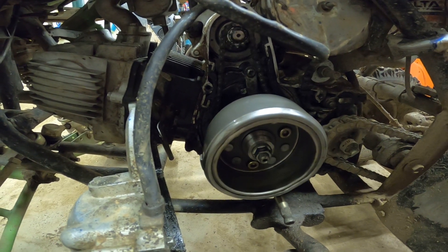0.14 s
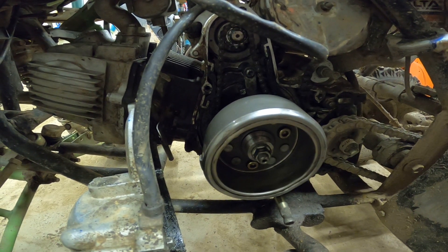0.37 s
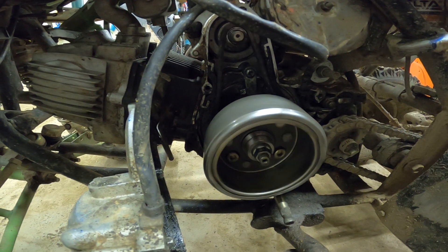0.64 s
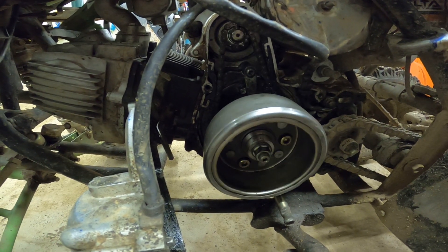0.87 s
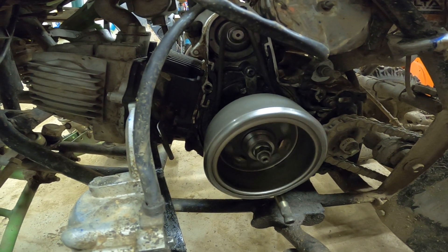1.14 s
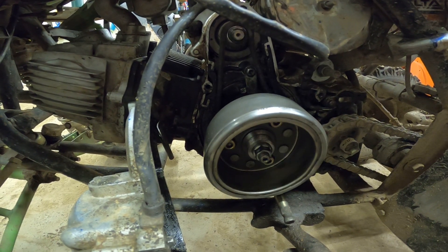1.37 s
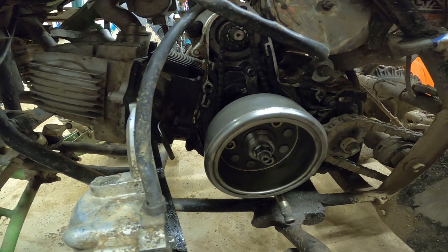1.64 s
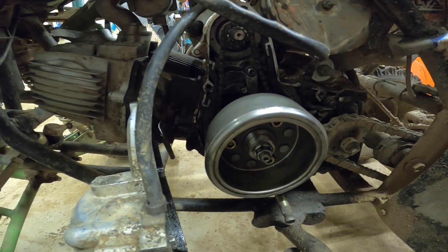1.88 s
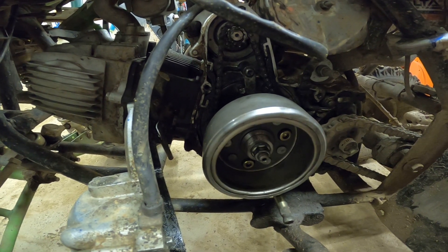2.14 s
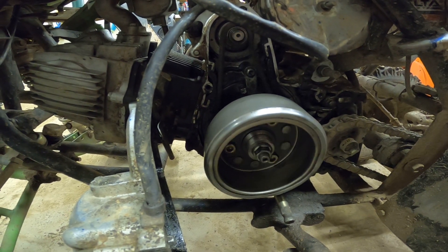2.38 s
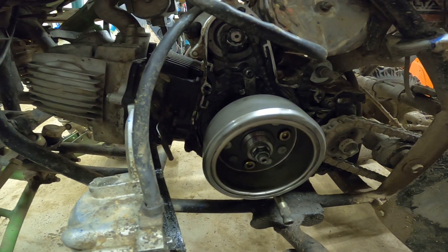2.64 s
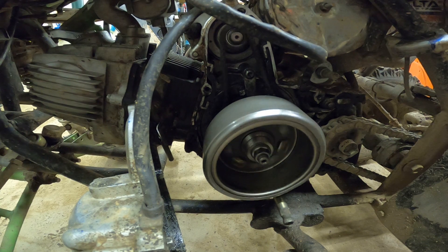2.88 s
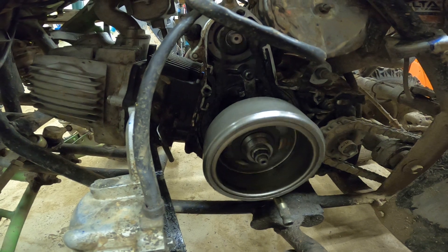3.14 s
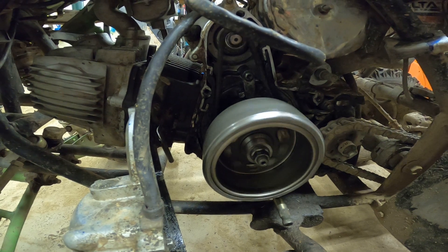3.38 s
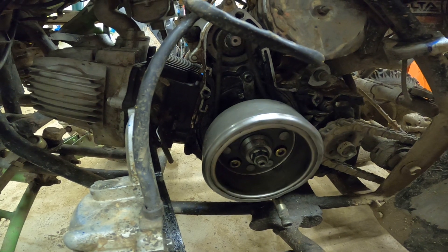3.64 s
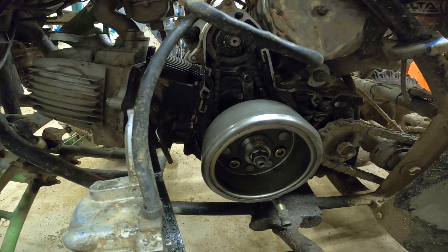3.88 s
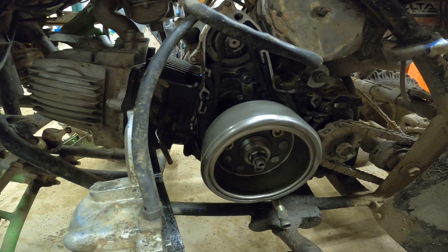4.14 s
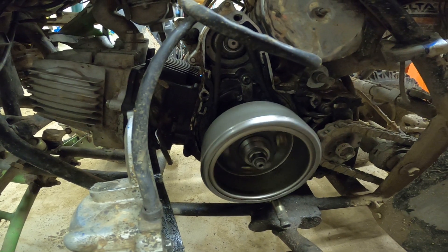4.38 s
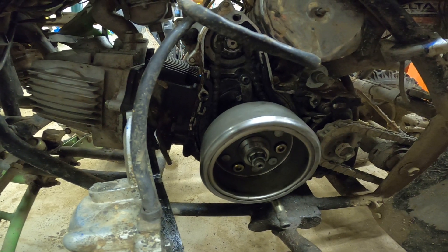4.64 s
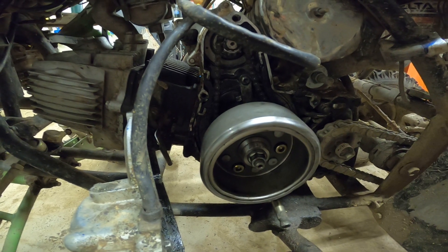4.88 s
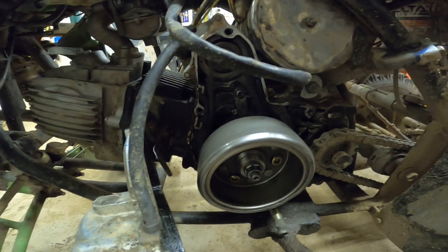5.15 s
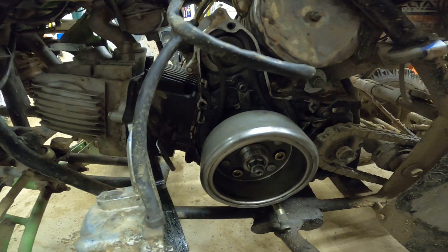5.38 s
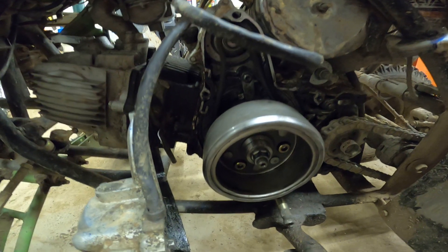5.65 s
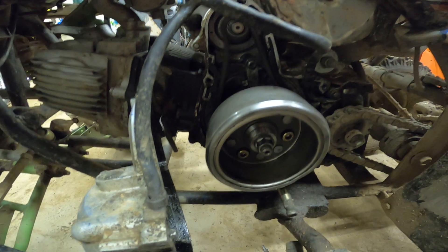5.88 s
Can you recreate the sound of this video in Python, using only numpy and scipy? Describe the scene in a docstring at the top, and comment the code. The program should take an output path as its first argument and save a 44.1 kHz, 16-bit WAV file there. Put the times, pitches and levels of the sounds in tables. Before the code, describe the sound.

A starter gear rattle coasts down with a few ticks, then a near-silent pause. Ten short bumps follow, irregularly spaced: each a hard solenoid clack, a rough metallic gear rattle and a low groan that dies quickly. Midway a toothy crash thumps the steel frame. Finally teeth grind in a rapid clatter and the motor spins on with a faint rising whine. Close stereo microphone, small workshop with light echo.

```python
"""Bumping a small engine's starter

An electric starter is bumped ten times in a workshop, close to a microphone with two ports.
Each bump is a solenoid clack, a gear rattle made of random tooth hits, and a groan of rough tones and noise.
Noise bursts make the pinion jarring the flywheel; they ring the steel frame, while low tones swell and fade.
At the end the pinion grinds in and the motor spins on, with a whine of sine tones that climbs and settles.
"""
import sys
import numpy as np
from scipy import signal
from scipy.fft import rfft, irfft, next_fast_len
from scipy.io import wavfile

SR = 44100
rng = np.random.default_rng(int(sys.argv[2]) if len(sys.argv) > 2 else 0)


def ratio_of_db(decibels):
    """Turn decibels (scalar or array-like) into linear amplitude factors; 0 dB maps to 1."""
    return 10 ** (np.asarray(decibels, float) / 20)


def transcribe(signal):
    """Save signal, clipped to [-1, 1], as a 16-bit WAV file at the path in sys.argv[1]."""
    frames = np.atleast_2d(signal).T
    limited = np.clip(frames, -1, 1)
    pcm = np.round(limited * 32767).astype(np.int16)
    wavfile.write(sys.argv[1], SR, pcm)


N = 265393

# Levels in the tables and settings are starting points: the functions add their own offsets.
# bumps of the starter: [solenoid closes t/s, run-up length t/s, top of rattle level/dB, coasting fall/(dB/s)]
BUMPS = [(0.683, 0.031, -14, 205.5), (1.3083, 0.07, -17.5, 153.5), (2.0849, 0.061, -14, 219),
         (2.426, 0.047, -19, 107.5), (2.621, 0.078, -14, 213), (3.013, 0.06, -25, 159),
         (3.2778, 0.06, -15.5, 241), (3.5516, 0.063, -19.5, 134.5), (4.2235, 0.052, -15, 230.5),
         (4.516, 0.081, -20, 142.5)]
# the motor surges again, without a solenoid clack of its own: [same columns as the bumps]
SURGE = (0.952, .048, -17, 240)
# a slow drag: [start t/s, top t/s, level/dB, rise/dB, fall/(dB/s), hold t/s]
CREEP = (0.82, 0.905, -26, 4, 300, .02)
# pinion seating and slack taken up: [t/s, level/dB]
CLACKS = [(0.082, -26), (0.163, -22.5), (0.6969, -8), (0.778, -5), (0.8946, -28), (0.928, -13.5),
          (0.942, -9.5), (1.456, -11), (2.1001, -6), (2.546, -13.5), (3.136, -31), (3.2972, -17.5),
          (3.692, -10.5), (4.2366, -6.5), (4.6667, -19.5), (5.1267, -10.5), (5.14, -11.5)]
# light ticks as gears settle and the switch moves: [t/s, level/dB]
TICKS = [(0.018, -14), (0.024, -18.5), (0.04, -25.5), (0.198, -38.5), (0.2257, -40), (0.2493, -32),
         (0.265, -37), (0.297, -37), (0.3186, -43), (0.342, -59), (0.637, -58.5), (0.666, -47),
         (1.468, -19), (1.525, -26), (1.556, -34), (1.654, -37.5), (1.7177, -39.5), (1.916, -50),
         (1.946, -41), (2.017, -52), (2.047, -39.5), (2.242, -29), (3.153, -25), (3.2174, -31),
         (3.853, -29.5), (3.9297, -41.5), (4.036, -39.5), (4.161, -45.5), (4.1875, -37), (4.849, -32),
         (4.9642, -38.5), (5.0912, -36.5)]
# pinion teeth jarring the flywheel ring: [t/s, crash level/dB, thump level/dB]
JARS = [(2.757, -6.5, -17), (2.7675, -10.5, -18), (5.1615, -5.5, -16.5), (5.181, -16.5, -31),
        (5.186, -9.5, -31), (5.2054, -14.5, -29), (5.209, -19.5, -17), (5.226, -10.5, -38.5),
        (5.2448, -9, -18), (5.2615, -7.5, -31), (5.2782, -10.5, -18), (5.294, -9, -26.5),
        (5.3453, -7.5, -38), (5.3542, -10, -27.5)]
# dull knocks of the button: [t/s, level/dB]
KNOCKS = [(0.641, -31), (0.665, -27.5)]
# faint bright hiss swelling before some clacks: [start t/s, level/dB]
HISSES = [(0.6385, -56.5), (2.048, -53.5), (4.1898, -53), (5.0907, -80)]
# the motor spinning free: [t/s, armature f/Hz, whine level/dB]
WHINE = [(5.45, 164.7, -43), (5.6, 197.3, -43), (5.8, 202.5, -35), (6.018, 206.4, -33.5)]
# whine tones: [multiple of the armature frequency, level/dB]
WHINE_ORDERS = [(1, -2), (2, -5.5), (4, -11.5), (6, -7)]
# bracket tones, peaking as the rotor slows: [top t/s, f/Hz, level/dB]
BRACKET_TONES = [(0.121, 316, -43), (0.735, 273.3, -28.5), (1.0, 374, -38), (1.4, 367, -28),
                 (2.2, 458, -33.5), (2.5, 416, -46), (2.67, 269, -36.5), (3.1, 306.2, -40),
                 (3.38, 420, -38.5), (3.649, 349, -36), (4.318, 462.3, -34), (4.609, 310.8, -29.5),
                 (5.3, 287.2, -25.5)]
# housing resonances: [f/Hz, width f/Hz (at least 20 is used), level/dB]
CASING = [(1047, 22, -3), (1139.5, 32, 8), (1233, 13, 2.5), (1327, 14, 4), (1608, 25, -1.5),
          (2060, 12, -22), (2103, 65, -3), (2268, 22, 9.5), (2667, 68, -9), (3267, 58, 8.5),
          (3608, 90, 0.5), (3740, 71, 7), (3964, 210, -1.5), (4860, 130, 11), (7140, 960, 1)]
# spectrum shapes, of which only the relative levels matter: [f/Hz, level/dB]
GEAR_COLOUR = [(180, -41), (300, -18.5), (838, -8), (1130, 0), (1790, -2), (2190, -1), (2500, -4),
               (4850, -13.5), (7330, -22.5), (12700, -39), (15700, -67.5)]   # gears under load
FREE_COLOUR = [(240, -14), (400, -12), (654, -15), (1210, -5.5), (1620, -3.5), (1770, -8.5), (3820, -9),
               (4390, -14), (4890, -15.5), (10000, -32), (12700, -35), (15700, -58)]   # gears running free
CLACK_COLOUR = [(180, -42), (300, -42), (1330, 8.5), (2010, 1), (2380, 7), (3200, 0), (4040, 3.5),
                (7450, -8), (15700, -33.5)]   # clacks, ticks and hisses
JAR_COLOUR = [(290, -37), (480, -19.5), (720, 1), (1260, -3), (1800, -5.5), (3450, 8), (5800, 1), (6900, 3),
              (12500, -21), (15700, -44.5)]   # crashes of the teeth
AIR_COLOUR = [(18, -34.5), (30, -1.5), (325, 7), (842, -29.5), (1140, -12.5), (12000, -30), (15600, -67),
              (22000, -120)]   # background noise
# ringing modes of the steel frame: [f/Hz, time to fall 60 dB t/s, level/dB]
FRAME = [(185.4, 0.12, -29.5), (221.5, 0.16, -25), (279.8, 0.21, -20), (330.6, 0.17, -24),
         (468, 0.064, -36)]
# the longest frame tube swells after a shove: [top t/s, level/dB]
HUM = [(0.049, -45.5), (0.36, -49.5), (0.78, -34), (1.0, -37), (1.5, -46.5), (2.19, -36.5), (2.78, -27),
       (2.9, -47), (3.38, -41), (3.62, -47.5), (3.851, -50), (4.3, -36), (4.42, -41), (4.719, -44),
       (5.19, -27.5), (5.235, -24.5), (5.36, -32)]
# a deeper frame mode, same rule: [top t/s, level/dB]
DRONE = [(0.8, -36.5), (2.2, -37.5), (2.81, -29), (3.4, -39.5), (3.5, -45.5), (4.33, -45)]
# the frame sways after the first jar: [t/s, level/dB]
SWAY = [(2.76, -40), (2.83, -28), (3.0, -43.5), (3.3, -46.5), (4.192, -54), (4.33, -39), (4.42, -48),
        (4.58, -60)]
# echo of the workshop: [f/Hz, time to fall 60 dB t/s]
SHOP_T60 = [(60, 0.5), (420, 0.082), (1100, 0.71), (2900, 0.3), (7700, 0.088), (15000, 0.26)]
# difference between the ports: [f/Hz, left minus right level/dB]
PORT_BALANCE = [(60, 8), (130, -3.5), (290, 1), (640, -1), (1410, 2.5), (3100, 3), (6820, -2),
                (15000, -4.5)]

SIDES = np.array([[1], [-1]])   # signs for the left and right port

# rattle during a bump: rise (dB), hold at the top (s), time from reaching the top to the end of torque (s)
RUN_UP_DB, HOLD_S, LET_GO_S = 8, .022, .045
LINGER_DB, LINGER_FALL = -18.5, 93   # loose parts buzz on: dB against the top, fall in dB per s
OPENING_DB, OPENING_FALL, OPENING_BRAKE = -25.5, 30, 195   # earlier run coasts out: dB, dB per s, dB per s^2
# the pinion grinds in: start, top and end (s), level (dB), fall (dB per s)
GRIND_S, GRIND_TOP_S, GRIND_END_S, GRIND_DB, GRIND_FALL = 5.123, 5.156, 5.3, -19.5, 600
RUN_S, RUN_RISE_S, RUN_DB = 5.35, 0.16, -23.5   # free run: start (s), rise time (s), rattle (dB)
# wander of the housing and unevenness of the teeth (dB); share of both that running free takes away
WANDER_DB, LUMPY_DB, FREE_CALM = 3.2, 3.5, .65
SNAGS_PER_S, SNAG_DB = 60, 15   # a burred tooth hits harder, until the grinding ends
TURN_BEAT = .45   # depth of the once-a-turn beat in the final run
# groan: level at a -19 dB rattle (dB), share of its swing, lag (s), rise (dB), fall (dB per s)
GROAN_DB, GROAN_FOLLOWS, GROAN_LAG_S, GROAN_RISE_DB, GROAN_FALL = -34, 1, 0.006, 10, 81.3
GROAN_OPENING_DB, GROAN_RUN_DB = -11.5, -37.5   # against the opening rattle; in the free run
GROAN_JAR_DB, GROAN_JAR_FALL = -18.5, 49   # dB against a thump, fall in dB per s
TONE_RISE_S, TONE_RISE_DB, TONE_HOLD_S, TONE_FALL = .05, 16, .04, 190   # bracket tone: s, dB, s, dB per s
SOLENOID_DB, SOLENOID_TRAVEL_S = -9, 0.0015   # the plunger lands just after it starts to move
FLUTTER_DB, FLUTTER_S = -21.5, 0.17   # loose joints chatter: dB against a thump, decay in s
HISS_RISE_S = 0.077   # time a hiss takes to swell
HUM_HZ, HUM_RISE_S, HUM_FALL = 145.7, 0.19, 64   # Hz, longest rise in s, dB per s
DRONE_HZ, DRONE_FALL = 79.1, 76   # Hz, dB per s
SWAY_HZ = 38.2
AIR_DB = -64
# above the top frequency the phase difference between the ports stays constant
LEFT_LAG_S, LAG_TOP_HZ = 4.5e-5, 5400


def effort():
    """Levels of gear rattle and motor groan: torque lifts both, and they fall as the motor coasts."""
    t = np.arange(N) / SR
    on, length, top_db, fall = np.transpose(BUMPS + [SURGE])
    top = on + length
    bumps = swells(on, top, top_db, RUN_UP_DB, fall, HOLD_S)
    linger = swells(top, top, top_db + LINGER_DB, 0, LINGER_FALL)
    opening = OPENING_DB - OPENING_FALL * t - OPENING_BRAKE * t ** 2
    grind = swells(GRIND_S, GRIND_TOP_S, GRIND_DB, 8.3, GRIND_FALL)
    grind = grind - 400 * np.maximum(t - GRIND_END_S, 0)
    run = swells(RUN_S, RUN_S + RUN_RISE_S, 0, 12.3, 0)
    rattle = together(bumps, swells(*CREEP), linger, opening, grind, RUN_DB + run)

    jar_s, _, thump_db = np.transpose(JARS)
    groan_top = GROAN_DB + GROAN_FOLLOWS * (top_db + 19)
    groaning = together(swells(on, top + GROAN_LAG_S, groan_top, GROAN_RISE_DB, GROAN_FALL),
                        GROAN_OPENING_DB + opening + 25 * t,
                        swells(jar_s, jar_s + 0.01, thump_db + GROAN_JAR_DB, 24.0, GROAN_JAR_FALL),
                        GROAN_RUN_DB + run)
    return rattle, groaning


def gears(rattle_db, armature, free):
    """Teeth touch densely and unevenly and shake the housing; running free they sound different and more even."""
    t = np.arange(N) / SR
    steady = free * (t > GRIND_END_S)
    touches_per_s = 3000 * ratio_of_db(LUMPY_DB * (1 - FREE_CALM * steady) * drift(50))
    touch = rng.random(N) < touches_per_s / SR
    strength = ratio_of_db(4.3 * np.minimum(rng.exponential(1, N), 3.2))
    force = touch * strength * (1 + TURN_BEAT * steady * np.cos(armature))
    snags = (rng.random(N) < SNAGS_PER_S / SR) * (t < GRIND_END_S)
    force = force + ratio_of_db(SNAG_DB) * snags

    meshes = []
    for mesh in range(2):   # the first is heard alike, the second opposed in the two ports
        signs = rng.choice([-1, 1], N)
        housing = casing(force * signs, broad_db=-3.0, shift_db=WANDER_DB * (1 - FREE_CALM * free))
        loaded = unit(colour(housing, GEAR_COLOUR))
        unloaded = unit(colour(housing, FREE_COLOUR))
        meshes.append((1 - free) * loaded + free * unloaded)
    rattle = meshes[0] + ratio_of_db(-17.0) * SIDES * treble(meshes[1], edge_hz=1500)

    starts = np.sort([-1, GRIND_S] + [bump[0] for bump in BUMPS + [SURGE]])
    began = starts[np.searchsorted(starts, t) - 1]
    slow = np.exp(-(t - began) / 0.0088)   # the level grows as the rotor gathers speed
    dull = np.exp(-(t - began) / 0.028)   # and the treble follows later
    off = np.sort([bump[0] + bump[1] + LET_GO_S for bump in BUMPS + [SURGE]])
    ended = np.append(-2, off)[np.searchsorted(off, t)]
    coast = (ended > began) * np.exp(-(t - ended) / 0.064)   # without torque the teeth unload at once
    top_share = np.clip(1 - 0.34 * dull - 0.82 * coast, 0, 1)
    top = top_share * treble(rattle, edge_hz=2970)
    body = treble(rattle, edge_hz=240) - treble(rattle, edge_hz=3290)
    return ratio_of_db(rattle_db - 2.0 - 19.0 * slow - 5.9 * coast) * (body + top)


def groan(db, free):
    """Slightly rough bracket tones over a low scrape of the motor; its shaking rumbles in each port."""
    t = np.arange(N) / SR
    wobble = .8 * drift(16)
    rough = ratio_of_db(4 * drift(35) - 2)
    tones = 0
    for s, hz, top_db in BRACKET_TONES:
        level_db = swells(s - TONE_RISE_S, s, top_db, TONE_RISE_DB, TONE_FALL, TONE_HOLD_S)
        tones = tones + ratio_of_db(level_db) * np.sin(2 * np.pi * hz * t + wobble)
    scrape_band = signal.butter(3, [220, 530], "band", fs=SR, output="sos")
    scrape = signal.sosfilt(scrape_band, rng.standard_normal(N))
    low_band = signal.butter(2, [30, 125], "band", fs=SR, output="sos")
    low = signal.sosfilt(low_band, rng.standard_normal((2, N)))
    lumps_db = 3 * drift(6)
    rumble = ratio_of_db(db - 16.0 - 40.0 * free + lumps_db) * unit(low)
    return np.sqrt(2) * rough * tones + ratio_of_db(db - 3.0) * unit(scrape), rumble


def whine(db, armature):
    """Commutator tone: wavering sines at multiples of the armature's turning rate."""
    on = np.clip((np.arange(N) / SR - WHINE[0][0]) / 0.051, 0, 1)
    waver_db, waver = .6, .05   # both grow with the multiple; the second is in radians
    tones = 0
    for k, order_db in WHINE_ORDERS:
        level = ratio_of_db(order_db + waver_db * k * drift(6.8))
        tones = tones + level * np.sin(k * armature + waver * k * drift(7))
    return on * np.sqrt(2) * ratio_of_db(db) * tones


def clacks():
    """Metal hits metal: a sharp crack, then the housing rings on; ticks are thinner and trail a short buzz."""
    landings = [(bump[0] + SOLENOID_TRAVEL_S, SOLENOID_DB) for bump in BUMPS]
    s, db = np.transpose(CLACKS + landings)
    tick_s, tick_db = np.transpose(TICKS)
    sudden_s = .0005
    hit = bursts(s, db - 7.0, decay_s=0.004, rise_s=sudden_s)
    tick = treble(bursts(tick_s, tick_db - 4.5, decay_s=0.0025, rise_s=sudden_s), edge_hz=600)
    buzz = bursts(tick_s, tick_db - 22.5, decay_s=0.0099, rise_s=0.004)
    crack = colour(hit + tick + buzz, CLACK_COLOUR)
    return crack + ratio_of_db(-0.5) * casing(crack, broad_db=-30.5, shift_db=3)


def jars():
    """A tooth hits the ring gear: bright crash and shudder, push into the frame, rumble stronger on the right."""
    s, crash_db, thump_db = np.transpose(JARS)
    parts = []
    for part in range(2):
        crash = bursts(s, crash_db - 2.0, decay_s=0.0038, rise_s=.0006)
        # most of the later teeth scrape up the ring gear just before the crash
        scrape = bursts(s[3:-2] - .005, crash_db[3:-2] - 8.5, decay_s=0.0025, rise_s=0.0014)
        shudder = bursts(s, thump_db - 30.5, decay_s=0.14, rise_s=0.0025)
        parts.append(colour(crash + scrape + shudder, JAR_COLOUR))
    mid, side = parts
    both = ratio_of_db(-1.5 * SIDES) * (mid + ratio_of_db(-4.5) * SIDES * treble(side, edge_hz=650))

    push = bursts(s, thump_db - 10.5, decay_s=0.013, rise_s=0.00061)
    # loose joints chatter once per sway
    beat = np.maximum(np.sin(2 * np.pi * SWAY_HZ * np.arange(N) / SR + drift(8)), 0) ** 2
    push = push + beat * bursts(s, thump_db + FLUTTER_DB, decay_s=FLUTTER_S, rise_s=0.011)

    low = signal.butter(2, [22, 110], "band", fs=SR, output="sos")
    rumble = [signal.sosfilt(low, bursts(s, thump_db + side_db, decay_s=0.02, rise_s=0.0034))
              for side_db in (14.0, 24.0)]
    return both, push, np.array(rumble)


def knocks():
    """The button knocks dully: softened clicks set a short low ringing going."""
    clicks = np.zeros(N)
    for s, db in KNOCKS:
        clicks[round(s * SR)] = ratio_of_db(db - 2.5)
    soft = signal.lfilter([.12], [1, -.9], clicks)
    return ring(soft, 310, 0.04)


def hiss():
    """Faint bright noise that swells and then dies quickly."""
    s, db = np.transpose(HISSES)
    return ratio_of_db(swells(s, s + HISS_RISE_S, db, 4.8, 400)) * unit(colour(rng.standard_normal(N), CLACK_COLOUR))


def casing(x, broad_db, shift_db):
    """Motor and gear housing: resonances over a broad part; the contact point wanders, so strengths shift."""
    out = ratio_of_db(broad_db) * x
    for k, (hz, width, db) in enumerate(CASING):
        r = np.exp(-np.pi * max(width, 20) / SR)
        poles = [1, -2 * r * np.cos(2 * np.pi * hz / SR), r * r]
        fed = x * ratio_of_db(db + shift_db * drift(15.0)) + 1e-18
        out = out + (-1) ** k * signal.lfilter([(1 - r * r) / 2, 0, (r * r - 1) / 2], poles, fed)
    return out


def frame(push):
    """Thumps set the low modes of the steel frame ringing."""
    modes = sum(ring(ratio_of_db(db) * push, hz, t60) for hz, t60, db in FRAME)
    return treble(modes, edge_hz=39)


def hum(rows, hz, fall):
    """A frame mode sounds as a narrow tone that wavers a little as it is fed and fades."""
    s, db = np.transpose(rows)
    shoves = np.sort([-1, JARS[0][0], JARS[2][0]] + [bump[0] for bump in BUMPS])
    last_shove = shoves[np.searchsorted(shoves, s) - 1]
    start = np.maximum(s - HUM_RISE_S, last_shove)   # never before the shove that feeds it
    level_db = swells(start, s, db, 12.0, fall)
    waver_db = 2.5 * drift(12)
    return ratio_of_db(level_db + waver_db) * np.sin(2 * np.pi * hz * np.arange(N) / SR + .5 * drift(34.0))


def sway():
    """The whole frame sways: a slow, wavering low mode, stronger in the right port."""
    t = np.arange(N) / SR
    on = np.clip((t - SWAY[0][0]) / .01, 0, 1) * np.clip((SWAY[-1][0] - t) / 0.029, 0, 1)
    waver_db = 2 * drift(5)
    level = ratio_of_db(in_time(SWAY)[0] + waver_db - 9.0 * SIDES)
    return on * level * np.sin(2 * np.pi * SWAY_HZ * t + .4 * drift(3))


def shop(x):
    """Diffuse echo: octave bands of noise, each dying at its own rate, unlike on the two sides."""
    t, tail = np.arange(SR) / SR, 0
    for low in 40 * 2. ** np.arange(9):
        band = signal.butter(2, [low, min(2 * low, .45 * SR)], "band", fs=SR, output="sos")
        noise = signal.sosfilt(band, rng.standard_normal((2, SR)))
        tail = tail + noise * ratio_of_db(-60 * t / at_hz(SHOP_T60, 1.4 * low))
    tail = tail * np.clip(t / 0.0068, 0, 1)
    return signal.fftconvolve(x[None], tail / np.linalg.norm(tail[0]), axes=1)[:, :N]


def air():
    """Steady background noise, mostly low, independent in the two ports."""
    return ratio_of_db(AIR_DB) * np.array([unit(colour(rng.standard_normal(N), AIR_COLOUR)) for side in range(2)])


def bursts(times, dbs, decay_s, rise_s):
    """Noise that swells quickly and dies away."""
    clicks = np.zeros(N)
    clicks[np.round(np.array(times) * SR).astype(int)] = ratio_of_db(np.array(dbs))
    decay, rise = np.exp(-1 / (decay_s * SR)), np.exp(-1 / (rise_s * SR))
    fading = signal.lfilter([1], [1, -decay], clicks + 1e-18)
    shape = signal.lfilter([1 - rise], [1, -rise], fading)
    return shape * rng.standard_normal(N)


def ring(x, hz, t60):
    """A unit click sets a dying sine of starting height 1 ringing."""
    r, w = ratio_of_db(-60 / (t60 * SR)), 2 * np.pi * hz / SR
    return signal.lfilter([0, np.sin(w)], [1, -2 * r * np.cos(w), r * r], x + 1e-18)


def swells(start_s, top_s, top_db, rise_db, fall, hold_s=0):
    """Level in dB of events that climb straight to a top, hold and then fall steadily; their powers add."""
    t, power = np.arange(0, N, 16) / SR, 1e-14   # every 16th sample is enough
    for on, top, db, rise, down in np.broadcast(start_s, top_s, top_db, rise_db, fall):
        still_to_climb = np.clip((top - t) / (top - on + 1e-6), 0, 1)
        level_db = db - rise * still_to_climb - down * np.maximum(t - top - hold_s, 0)
        power = power + (t >= on) * ratio_of_db(2 * level_db)
    return np.interp(np.arange(N) / SR, t, 10 * np.log10(power))


def together(*dbs):
    """Power sum of levels in dB."""
    return 10 * np.log10(sum(ratio_of_db(2 * db) for db in dbs))


def drift(rate_hz):
    """Slow random wandering of rms 1."""
    r = np.exp(-2 * np.pi * rate_hz / SR)
    return unit(signal.lfilter([1], [1, -2 * r, r * r], rng.standard_normal(N + SR))[SR:])


def colour(x, points):
    """Filter without pre-echo (minimum phase) that follows a spectrum, with energy 1."""
    cepstrum = irfft(np.log(ratio_of_db(at_hz(points, np.linspace(0, SR / 2, 1025)))))
    cepstrum[1:1024] *= 2   # folding the second half onto the first gives minimum phase
    cepstrum[1025:] = 0
    kernel = irfft(np.exp(rfft(cepstrum)))
    return signal.fftconvolve(x, kernel / np.linalg.norm(kernel))[:N]


def treble(x, edge_hz):
    """Keeps what lies above an edge frequency."""
    return signal.sosfilt(signal.butter(2, edge_hz, "high", fs=SR, output="sos"), x)


def unit(x):
    """Scales to rms 1."""
    return x / np.sqrt(np.mean(x ** 2) + 1e-20)


def in_time(rows):
    """Draws straight lines between the rows of a table in time."""
    s, *columns = np.transpose(rows)
    return [np.interp(np.arange(N) / SR, s, c) for c in columns]


def at_hz(points, hz):
    """Reads a table at given frequencies, along a log frequency axis."""
    table_hz, values = np.transpose(points)
    return np.interp(np.log(np.maximum(hz, 1)), np.log(table_hz), values)


def scene():
    """Adds the starter's sounds, their echo, the low shaking and the background."""
    rattle_db, groan_db = effort()
    armature_hz, whine_db = in_time(WHINE)
    armature = 2 * np.pi * np.cumsum(armature_hz) / SR   # angle in radians
    t = np.arange(N) / SR
    # unloaded: the first coast-down and the last run
    free = np.clip((t - RUN_S - .05) / 0.14, 0, 1) + (t < BUMPS[0][0])
    crash, push, thumps = jars()
    groaning, rumble = groan(groan_db, free)
    near = gears(rattle_db, armature, free) + groaning + whine(whine_db, armature)
    near = near + clacks() + crash + knocks() + hiss() + frame(push)
    echo = ratio_of_db(-14.0) * shop(near.mean(axis=0))
    tubes = hum(HUM, HUM_HZ, HUM_FALL) + hum(DRONE, DRONE_HZ, DRONE_FALL)
    return near + echo + thumps + rumble + sway() + tubes + air()


def top_cut(x):
    """Nothing passes above the cut-off."""
    return signal.sosfilt(signal.butter(12, 15850, fs=SR, output="sos"), x)


def record(dry):
    """Two ports of unlike colour, the left hearing a little later; peaks are rounded."""
    size = next_fast_len(N)
    hz = np.arange(size // 2 + 1) * SR / size
    tilt = ratio_of_db(at_hz(PORT_BALANCE, hz) / 2)
    lag = np.exp(-2j * np.pi * np.minimum(hz, LAG_TOP_HZ) * LEFT_LAG_S)
    ports = np.array([tilt * lag, 1 / tilt])
    heard = irfft(rfft(dry, size) * ports, size)[:, :N]
    mix = 0.78 * np.tanh(heard / 0.85)
    return top_cut(mix)


dry = scene()
out = record(dry)
transcribe(out)
```